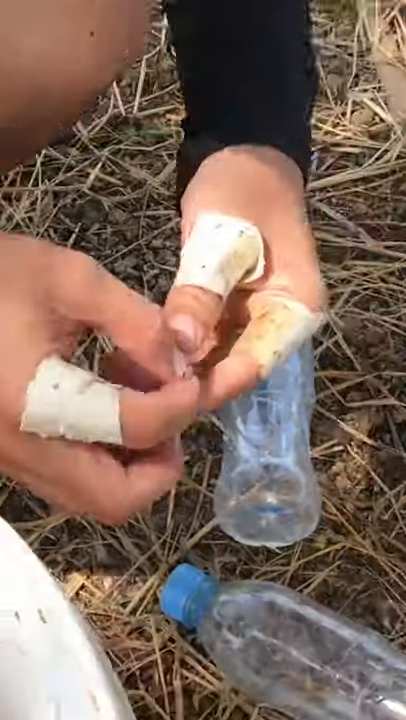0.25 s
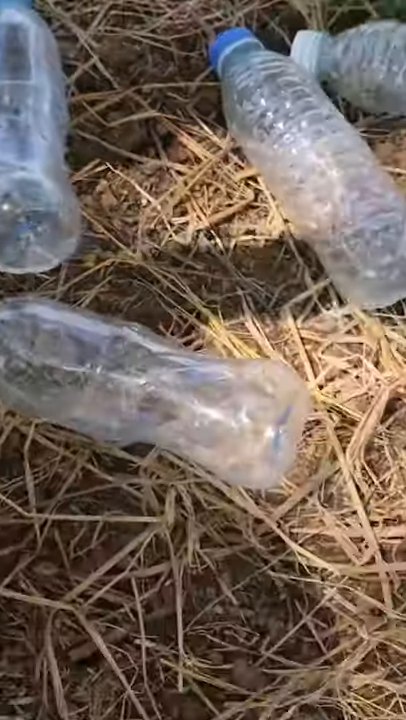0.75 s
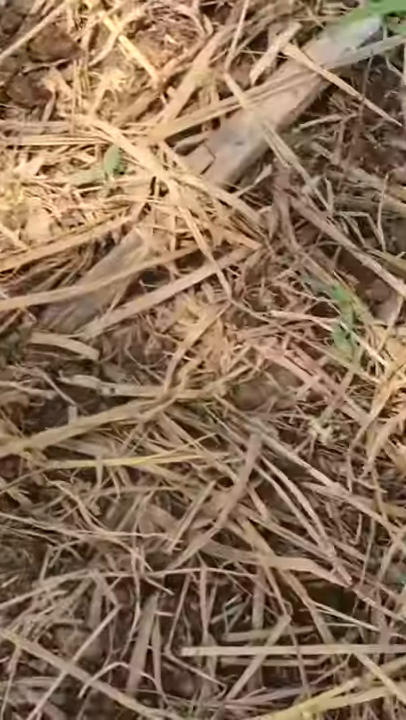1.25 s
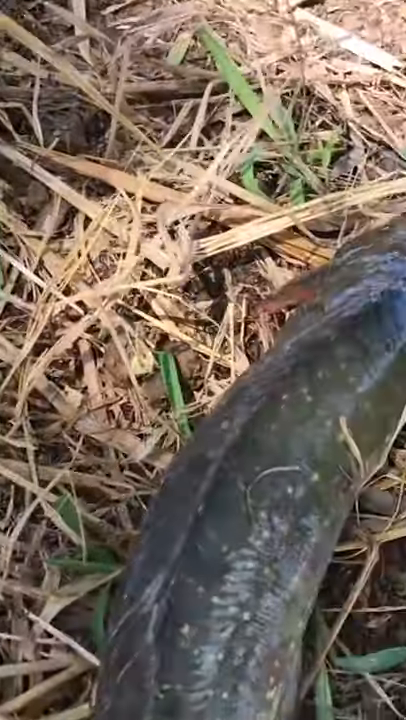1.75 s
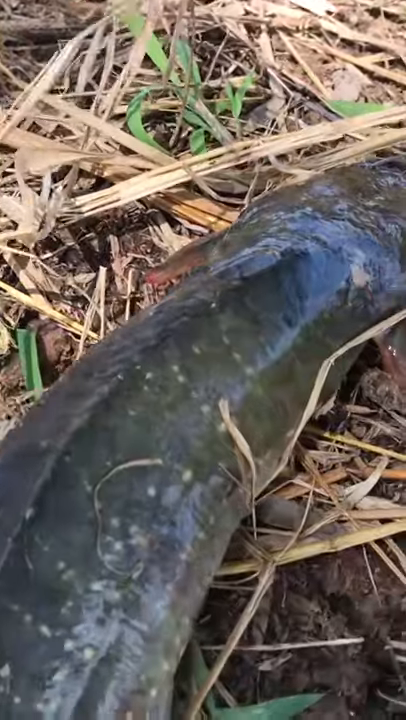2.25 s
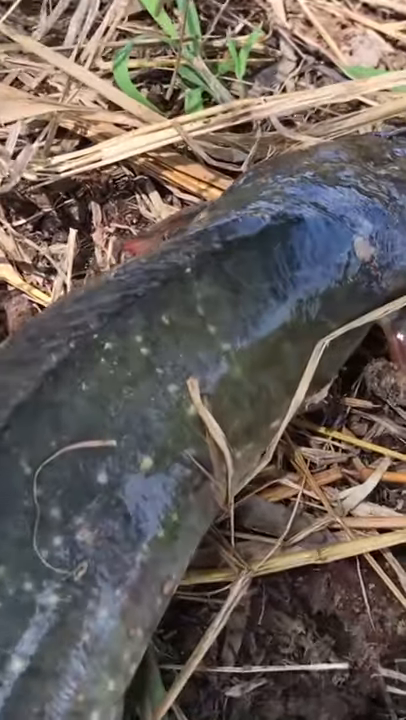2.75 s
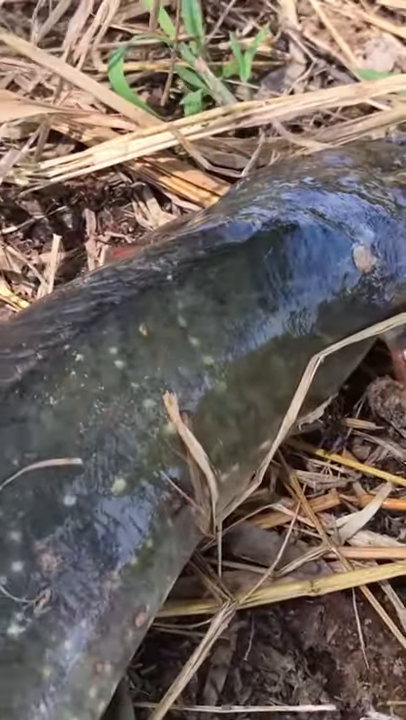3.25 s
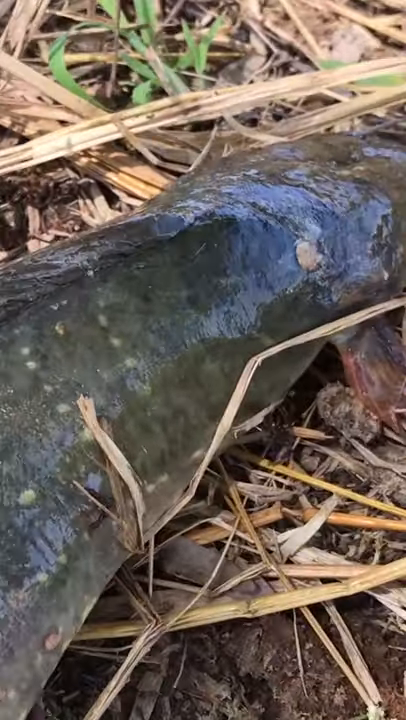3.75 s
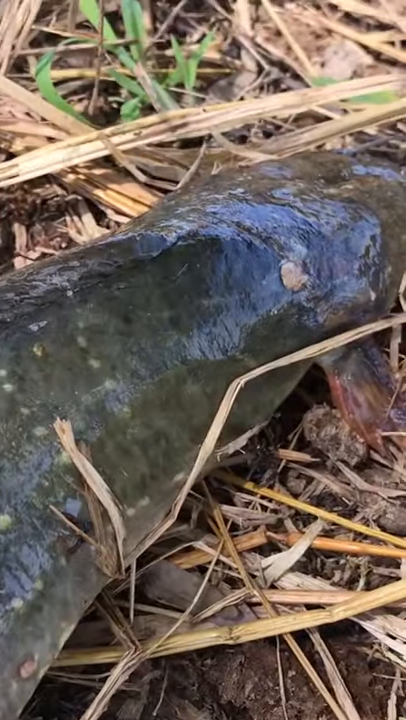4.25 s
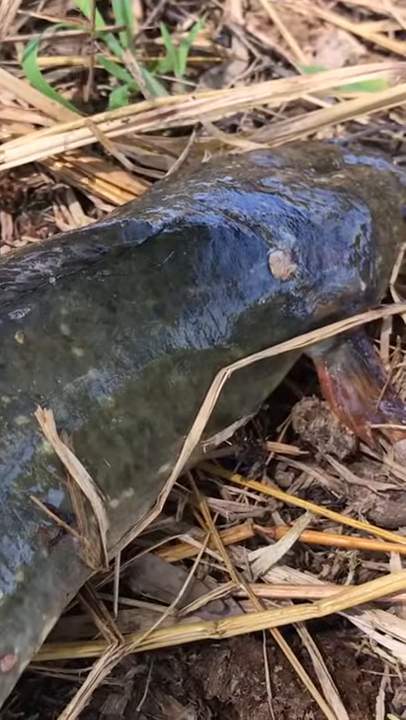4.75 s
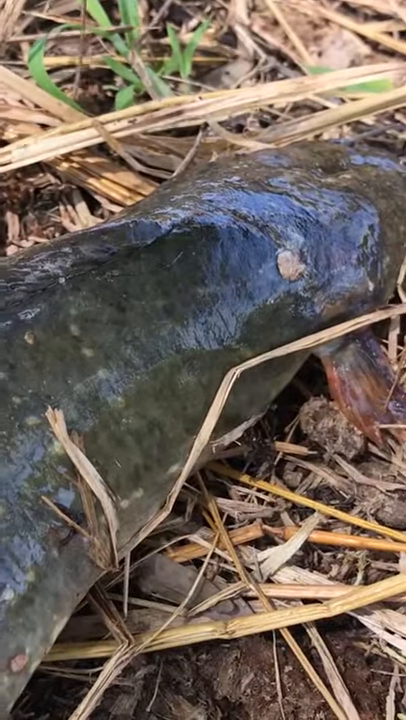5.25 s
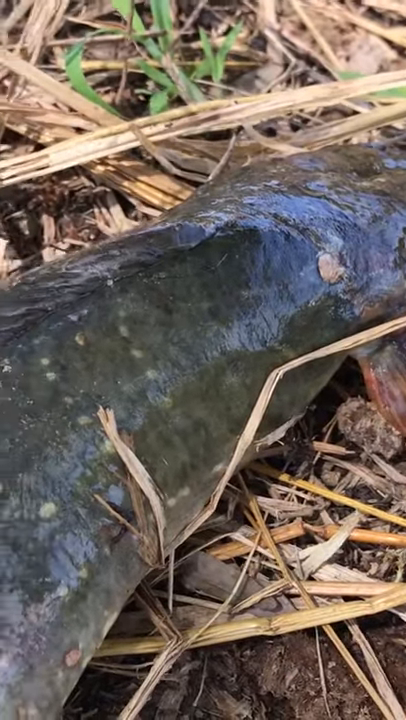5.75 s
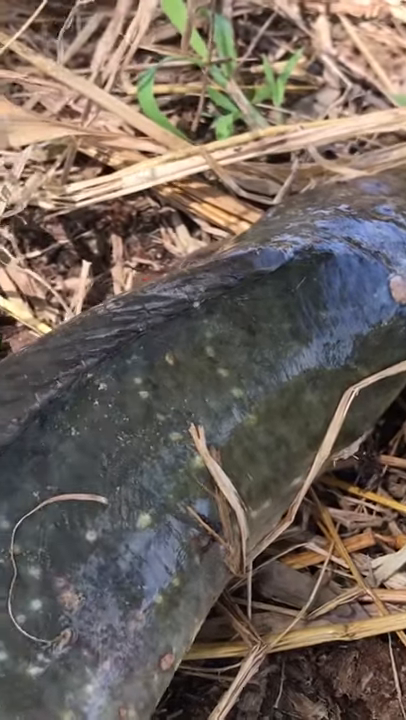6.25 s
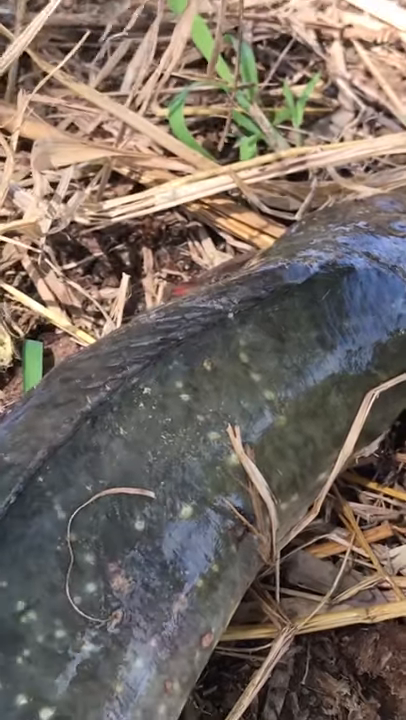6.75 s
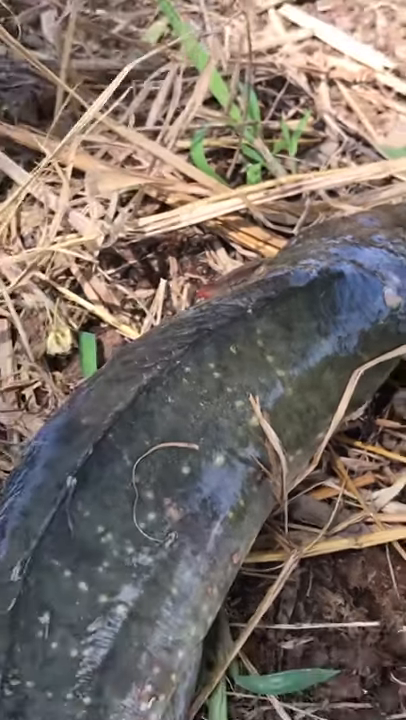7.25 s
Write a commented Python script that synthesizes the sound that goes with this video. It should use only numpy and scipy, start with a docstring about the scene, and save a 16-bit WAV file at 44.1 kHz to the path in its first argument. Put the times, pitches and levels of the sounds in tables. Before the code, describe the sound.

Outdoors on dry straw, close to the microphone, straw rustles and a faint squeak sounds early. Then thin plastic bottles crackle: a few snaps, a dense loud flurry in the middle, and a last tight group. Afterwards it is nearly quiet, with two small ticks, soft straw, a distant low engine rumble and sparse bird chips.

```python
"""Outdoors, on dry straw, thin plastic bottles crinkle: dents in their walls flip with short, dry snaps.
Each snap is filtered noise plus a dying tone; faint noise swells just before it and a faint tail follows.
Straw rustles, hisses and scrapes close by (shaped noise and tiny ticks); one faint squeak falls early on.
Far off are a low rumble of noise, an engine hum of steady multiples and a few bird chips of gliding tone."""
import sys
import numpy as np
from scipy import signal
from scipy.fft import rfft, irfft, next_fast_len
from scipy.io import wavfile
from scipy.ndimage import uniform_filter1d, map_coordinates

SR = 44100
rng = np.random.default_rng(int(sys.argv[2]) if len(sys.argv) > 2 else 0)


def waveform_to_disk(signal):
    """Save audio, clipped to [-1, 1], as 16-bit WAV at the path in sys.argv[1]."""
    frames = np.transpose(np.atleast_2d(signal))
    scaled = np.clip(frames, -1, 1) * 32767
    samples = np.round(scaled).astype(np.int16)
    wavfile.write(sys.argv[1], SR, samples)


N = 330309
TIME = np.arange(N) / SR


def amp(db):
    """Turn decibels into a plain factor."""
    return 10 ** (np.asarray(db) / 20)


def unit(x):
    """Scale x to an average strength (rms) of 1."""
    return x / np.sqrt(np.mean(x ** 2) + 1e-20)


def curves(rows):
    """One value per sample for each column after the time."""
    times, *columns = np.transpose(rows)
    return [np.interp(TIME, times, column) for column in columns]


def wobble(rate):
    """A smooth random curve through `rate` random points a second."""
    points = rng.standard_normal(int(N * rate / SR) + 4)
    return map_coordinates(points, [TIME * rate])


def filtered(x, response):
    """Multiply the spectrum of x by a response that depends on frequency."""
    size = next_fast_len(N + SR // 2)
    spectrum = rfft(x, size) * response(np.fft.rfftfreq(size, 1 / SR))
    return irfft(spectrum, size)[:N]


def coloured(x, spectrum):
    """Shape x by a table of (frequency, level) points, then bring it to rms 1."""
    points_hz, points_db = np.transpose(spectrum)
    return unit(filtered(x, lambda hz: amp(np.interp(np.log(hz + 1), np.log(points_hz), points_db))))


def band(x, lo_hz, hi_hz, order=3):
    """Keep only the band between two frequencies."""
    edges = [lo_hz, min(hi_hz, SR / 2 - 1)]
    return signal.sosfilt(signal.butter(order, edges, "band", fs=SR, output="sos"), x)


def burst(x):
    """Scale a short sound to hold the energy of 10 ms at rms 1."""
    return x * np.sqrt(.01 * SR / (np.sum(x ** 2) + 1e-20))


def add(track, s, x):
    """Mix x into the track from time s."""
    start = max(round(s * SR), 0)
    track[start:start + len(x)] += x[:max(N - start, 0)]


def arch(length):
    """Time axis and a swell that rises faster than it dies."""
    t = np.arange(int(max(length, .004) * SR)) / SR
    return t, np.sin(np.pi * (t / t[-1]) ** 0.45) ** 2


# colour of the far rumble: (frequency [Hz], relative level [dB])
RUMBLE_COLOUR = [(13, -40.5), (22, -24.5), (49, -0.5), (113, -3.5), (155, -7.5), (172, -22), (204, -13),
                 (269, -15.5), (354, -19.5), (398, -24.5), (555, -27.5), (700, -26), (910, -53.5),
                 (1540, -120)]
RUMBLE_DB, RUMBLE_SWING_DB = -57, 1.5  # level and slow drift
# engine hum: (multiple of the firing rate, level [dB])
ENGINE_ORDERS = [(3, -69.5), (4, -69), (5, -63.5), (6, -62), (7, -67.5)]
FIRING_HZ = 24.47


def distance():
    """Low outdoor rumble, and a far engine whose hum sits on multiples of its unsteady firing rate."""
    noise = coloured(rng.standard_normal(N), RUMBLE_COLOUR)
    rumble = amp(RUMBLE_DB + RUMBLE_SWING_DB * wobble(6)) * noise
    firing_hz = FIRING_HZ * (1 + .006 * wobble(3.9))
    phase = 2 * np.pi * np.cumsum(firing_hz) / SR
    hum = np.zeros(N)
    for multiple, db in ENGINE_ORDERS:
        tone = np.sin(multiple * phase + 2 * np.pi * rng.random())
        hum += amp(db + 0.91 * wobble(3.1)) * unit(tone)
    return rumble + hum


# far small birds: (time [s], length [s], pitch [Hz], level before the swell and a common trim [dB])
BIRD_CHIPS = [(.125, 0.048, 3930, -65), (2.52, 0.058, 4320, -66), (2.583, 0.044, 3900, -62),
              (4.917, 0.017, 5850, -74), (5.029, 0.015, 5830, -71), (5.973, 0.019, 5977, -75.5),
              (6.806, 0.022, 5820, -69)]


def birds():
    """Far birds give short tones that fall slightly, flutter, and swell and fade smoothly."""
    out, flutter = np.zeros(N), .012 * wobble(500)
    for s, length, hz, db in BIRD_CHIPS:
        t, swell = arch(length)
        fall = 0.046 * (.5 - t / t[-1])
        pitch = hz * (1 + fall + flutter[round(s * SR):][:len(t)])
        tone = unit(np.sin(2 * np.pi * np.cumsum(pitch) / SR))
        add(out, s, amp(db - 2.0) * swell * tone)
    return out


# strokes over the straw: (time near the peak [s], rise [s], fall [s],
#                          rustle level before a trim [dB], hiss level before a trim [dB])
STROKES = [(.01, 0.072, 0.052, -59, -55.5), (.33, .11, 0.25, -59, -52), (1.2, .3, 0.18, -67.5, -72.5),
           (2.02, .22, .2, -58, -64), (3.5, .19, 0.099, -56, -60), (4.05, .2, .25, -66.5, -77.5),
           (7.45, .45, .3, -73, -72)]
STILL_RUSTLE_DB, STILL_HISS_DB = -73.5, -81  # the straw at rest, before the same trims


def brushing():
    """Rustle and hiss levels in dB: each stroke swells and fades over the straw at rest."""
    power = amp([[STILL_RUSTLE_DB], [STILL_HISS_DB]]) ** 2
    for s, rise, fall, rustle_db, hiss_db in STROKES:
        swell = 2 * np.exp(-np.logaddexp((s - TIME) / rise, (TIME - s) / fall))
        power = power + (amp([[rustle_db], [hiss_db]]) * swell) ** 2
    return 10 * np.log10(power)


def stalks(rate, spread_db, tick_db):
    """Smooth rubbing noise with dense, tiny ticks of single stalks, `rate` a second, each very short."""
    t = np.arange(SR // 150) / SR
    ticks = np.zeros(N)
    for when, pitch, size in rng.random((int(rate * N / SR), 3)):
        hz = 700 * 22 ** pitch
        tick = np.sqrt(hz) * np.sin(2 * np.pi * hz * t) * np.exp(-hz * t)
        add(ticks, when * N / SR, amp(spread_db * size) * tick)
    return rng.standard_normal(N) + amp(tick_db) * unit(ticks)


def patchy(x, depth_db):
    """The colour drifts as different stalks take over: random smooth gains over time and frequency."""
    cells = signal.stft(x, nperseg=512)[2]
    field = rng.standard_normal(cells.shape)
    field = uniform_filter1d(field, size=6, axis=0)
    field = uniform_filter1d(field, size=24, axis=1)
    return unit(signal.istft(cells * amp(depth_db * unit(field)), nperseg=512)[1][:N])


# colour of the straw's rustle: (frequency [Hz], relative level [dB])
RUSTLE_COLOUR = [(180, -28), (300, -2.5), (404, -2), (872, -5), (1210, -6), (2140, -9), (2570, -10),
                 (3100, -13), (4950, -15), (9000, -19.5), (11700, -30.5), (19800, -120)]
# colour of the straw's hiss: (frequency [Hz], relative level [dB])
HISS_COLOUR = [(1760, -42.5), (3000, -11.5), (4520, -11.5), (4950, -14), (6400, -9.5), (7610, -11.5),
               (10300, -6), (14800, 1.5), (15800, -3.5)]


def straw():
    """Dry stalks rub together: a fuller rustle and a bright hiss, both louder when brushed."""
    rustle_db, hiss_db = brushing()
    rustle = coloured(stalks(rate=490, spread_db=20, tick_db=-8), RUSTLE_COLOUR)
    rustle = patchy(rustle, depth_db=2.0)
    hiss = coloured(stalks(rate=630, spread_db=19.5, tick_db=-5.5), HISS_COLOUR)
    rustle_gain = amp(rustle_db - 0.94 + 1.3 * wobble(18))
    hiss_gain = amp(hiss_db + 1.0 + 0.7 * wobble(20))
    return rustle_gain * rustle + hiss_gain * hiss


# level is relative to the rustle level from brushing()
STALK_CRACKS_PER_S, STALK_CRACK_DB, STALK_SPREAD_DB, STALK_CRACK_HZ = 5.1, -0.5, 3, 2100


def stalk_cracks():
    """Now and then a dry stalk gives way with a faint noise tick, louder while the straw is brushed."""
    out, t = np.zeros(N), np.arange(SR // 30) / SR
    for when, size, pitch in rng.random((int(STALK_CRACKS_PER_S * N / SR), 3)):
        hz = STALK_CRACK_HZ * 2 ** (pitch - .5)
        noise = rng.standard_normal(len(t)) * np.exp(-t / 0.0036)
        tick = burst(band(noise, hz * .5, hz * 2, order=1))
        add(out, when * N / SR, amp(STALK_CRACK_DB + STALK_SPREAD_DB * (2 * size - 0.5)) * tick)
    rustle_db, _ = brushing()
    return amp(rustle_db) * out


# stalks and plastic sliding on each other:
# (time [s], length [s], centre [Hz], width [Hz], level before the swell and uneven grip [dB])
SLIDES = [(0.348, 0.69, 760, 435, -61.5), (.52, 0.97, 2250, 600, -70.5), (0.646, .033, 5900, 6000, -54.5),
          (0.677, 0.016, 3200, 500, -55), (0.985, .093, 13000, 5100, -55), (1.206, .004, 12700, 6000, -53),
          (2.099, 0.52, 1750, 1090, -67), (3.288, 0.29, 580, 450, -56), (3.682, 0.15, 5800, 800, -66),
          (3.871, 0.44, 3950, 1100, -70), (4.252, .12, 3280, 500, -65), (4.146, 0.26, 537, 490, -59.5),
          (5.411, .042, 2090, 702, -67.5), (5.553, .035, 1696, 2200, -68),
          (7.108, 0.021, 2695, 4000, -64.5), (7.201, 0.012, 14000, 3490, -59.5),
          (7.285, 0.028, 4000, 5960, -67.5)]


def scrapes():
    """Each slide catches and slips: one broad band of noise whose strength varies unevenly."""
    out, grip = np.zeros(N), amp(5.3 * wobble(110))
    for s, length, hz, width_hz, db in SLIDES:
        t, swell = arch(length)
        lo_hz = np.hypot(hz, width_hz / 2) - width_hz / 2
        rub = unit(band(rng.standard_normal(len(t)), lo_hz, lo_hz + width_hz, order=2))
        add(out, s, amp(db) * swell * rub)
    return out * grip


# path of the squeak, before its random wobble: (time [s], pitch [Hz], level [dB])
SQUEAK_PATH = [(.2, 973, -76), (.22, 835, -59), (.25, 664, -62), (.275, 592, -48.5), (.305, 597, -57.5),
               (.335, 581, -46.5), (.35, 608, -44.5), (.37, 590, -87)]


def squeak():
    """A thin, slightly rough tone with a faint octave above; it slides down and settles."""
    hz, db = curves(SQUEAK_PATH)
    phase = 2 * np.pi * np.cumsum(hz * (1 + 0.021 * wobble(154.3))) / SR
    sounding = (TIME > SQUEAK_PATH[0][0]) & (TIME < SQUEAK_PATH[-1][0])
    tone = unit(np.sin(phase) + amp(-35) * np.sin(2 * phase))
    return sounding * amp(db + 3.2 * wobble(86.5)) * tone


def random_ticks():
    """Tiny noise ticks, two strewn at random times around each snap."""
    out, t = np.zeros(N), np.arange(SR // 80) / SR
    for s, db, *_ in SNAPS:
        for delay, size, pitch in rng.standard_normal((2, 3)):
            hz = 2300 * np.exp(0.54 * np.clip(pitch, -2, 2))
            noise = rng.standard_normal(len(t)) * np.exp(-t / 0.0014)
            tick = burst(band(noise, hz / 3.5, hz * 1.2, order=1))
            level_db = -47 + 0.53 * db + 2 * np.clip(size, -2, 2)
            add(out, s + 0.015 + .04 * delay, amp(level_db) * tick)
    return out


# resonances of a bottle wall: (frequency [Hz], width [Hz], level [dB])
WALL_RESONANCES = [(380, 30, -3), (590.5, 110, 4), (1043, 50, -2.5), (1570, 360, 2), (2120, 430, -2.5),
                   (3460, 900, -1.5), (4400, 350, 2), (5928, 280, -0.5), (7305, 300.2, -9.5),
                   (10000, 450, -12.5), (14400, 870, -3.5)]


def buckle(t, life, ring, ring_db):
    """Tiny uneven folds plus flexing (noise with two decays), heard through the wall's resonances."""
    push = np.exp(-(t / life) ** 1.4) + amp(ring_db) * np.exp(-t / ring)
    rise = .00004 * (life / 0.0012) ** 2  # slow dents start softly
    folds = rng.standard_normal(len(t)) * push * (1 - np.exp(-t / rise))
    out = folds
    for hz, width, db in WALL_RESONANCES:
        out = out + amp(db) * signal.lfilter(*signal.iirpeak(hz, hz / width, SR), folds)
    return out


def snap(knock_db, crack_db, sizzle_db, panel_hz, life):
    """One dent flips: the crease cracks and sizzles, the panel swings, the hollow body knocks."""
    t = np.arange(SR // 16) / SR
    swing = np.sin(2 * np.pi * panel_hz * t) * np.exp(-t / 0.0012) * (1 - np.exp(-t / 0.00053))
    stiff = (panel_hz / 1700) ** .3  # a small, stiff dent flexes in a higher band
    flex = band(buckle(t, life=1.8 * life, ring=0.0038, ring_db=0.0), 930 * stiff, 2550 * stiff)
    own_pitch = signal.lfilter(*signal.iirpeak(panel_hz, 5.5, SR), flex)
    flex = flex + amp(0.5) * own_pitch  # the panel favours its own pitch
    panel = burst(burst(flex) + amp(-3) * burst(swing))
    knock = burst(band(buckle(t, life=.005, ring=.008, ring_db=-7.5), 240, 800, order=2))
    crack = burst(band(buckle(t, life=1.5 * life, ring=0.0033, ring_db=-8.5), 3000, 7000))
    sizzle = burst(band(buckle(t, life=1.4 * life, ring=.0045, ring_db=-15.5), 7000, 15000))
    low_parts = amp(0.5) * panel + amp(knock_db - 0.5) * knock
    return low_parts + amp(crack_db - 1.1) * crack + amp(sizzle_db - 0.34) * sizzle


def scatter(x, t60, dull_db):
    """The faint, quick answer of the ground and plants around: x smeared by fading noise."""
    t = np.arange(SR // 4) / SR
    noise = rng.standard_normal(len(t))
    dulled = noise + amp(dull_db) * band(noise, 200, 1800, order=1)
    tail = dulled * amp(-60 * t / t60) * (1 - np.exp(-t / .005))
    return signal.fftconvolve(x, tail / np.linalg.norm(tail))


def lead_in(rise):
    """A faint noise that swells over a few ms before each snap."""
    t = np.arange(SR // 50) / SR
    noise = band(rng.standard_normal(len(t)), 700, 3600, order=2)
    return burst(noise * np.exp((t - t[-1]) / rise))


# squeezes, in which small dents give way: (start time [s], length [s], dents per second, middle level [dB])
SQUEEZES = [(0.119, 0.074, 28, -61), (2.091, .05, 40, -53), (2.741, .03, 60, -57.5),
            (3.308, .15, 40, -56.5), (3.52, .18, 22, -55.5), (3.96, .3, 20, -60), (4.389, .1, 30, -63.5),
            (5.231, 0.068, 28, -68)]
# a small dent is slow, dull and hollow; knock and crack are relative to its level, before trims
DENT_SPREAD_DB, DENT_KNOCK_DB, DENT_CRACK_DB, DENT_HZ, DENT_BUCKLE_S = 2.5, 5.5, -12, 1400, .0032


def small_dents():
    """Rows like those of the snaps, falling unevenly through each squeeze."""
    rows = []
    for start, length, rate, db in SQUEEZES:
        count = max(round(length * rate), 1)
        for k, (late, size, crack, pitch) in enumerate(rng.uniform(-1, 1, (count, 4))):
            s = start + length * (k + .5 + .5 * late) / count
            level_db = db + DENT_SPREAD_DB * size
            crack_db = DENT_CRACK_DB + 4.5 * crack
            panel_hz = DENT_HZ * 1.5 ** pitch
            rows.append((s, level_db, DENT_KNOCK_DB, crack_db, panel_hz, DENT_BUCKLE_S))
    return rows


# dents that flip with a clear snap; levels are before small trims:
# (time [s], level [dB], hollow knock relative to level [dB], crack relative to level [dB],
#  panel pitch [Hz], buckling time before each part's stretch [s])
SNAPS = [(.025, -43.5, -2.5, -4, 1280, 0.0023), (0.4044, -53.5, -6, -5.5, 1960, 0.0042),
         (1.3508, -59.5, -2, -8, 1590, 0.003), (1.5166, -39.5, -30, -6.5, 2000, 0.0015),
         (1.5361, -35, -3, -26.5, 1370, 0.0015), (1.5489, -28.5, -13.5, -4, 1480, 0.0013),
         (1.8672, -32, -2, 0.5, 2080, 0.0017), (1.8894, -33.5, -4.5, 1, 1750, 0.0015),
         (1.9561, -29.5, -6, -4, 1820, .0025), (1.9623, -26.5, -10, -5, 1410, 0.0014),
         (2.0297, -47, 0.5, 0, 2360, 0.0022), (2.054, -44.5, 0, -13, 1090, 0.019),
         (2.0847, -43.5, -5.5, -6.5, 1880, 0.0038), (2.4024, -47, -18, -12, 2080, 0.0031),
         (2.4258, -45.5, -3, -8.5, 1370, 0.0035), (2.6532, -53.5, -14, -2, 2000, 0.00099),
         (2.7261, -39, -9, -19, 1440, 0.0023), (2.8463, -48, -11, -20, 1370, .0066),
         (2.8573, -37, -4.5, -13.5, 1480, 0.0041), (2.8632, -30.5, -6, -3, 1160, .0017),
         (2.8893, -29, -12, -1, 1450, 0.0014), (3.0526, -34.5, -16.5, 0.5, 2050, 0.0015),
         (3.0633, -44.5, -14, -9, 2130, .005), (3.121, -35.5, -7, 0.5, 1700, 0.0019),
         (3.1818, -41.5, -4, -3, 2020, 0.0027), (3.1896, -37.5, -7, 2, 2300, 0.0029),
         (3.2168, -45, 1.5, -7, 2040, .0022), (3.223, -45.5, -2.5, -8.5, 1260, .0034),
         (3.237, -45.5, -11.5, -4.5, 1270, .0023), (3.2823, -34, -9, -1, 1910, 0.0021),
         (3.2974, -24, -17, -1.5, 2190, 0.0015), (3.334, -40.5, 0.5, -7.5, 1780, 0.0019),
         (3.3453, -46.5, 0, -1.5, 2030, 0.0023), (3.384, -45.5, 5.5, -12.5, 1975, 0.0052),
         (3.4654, -27.5, -17.5, 3, 1730, 0.0019), (3.4982, -19.5, -13.5, -4, 1856, 0.0013),
         (3.5619, -35, -7.5, -8.5, 2020, 0.0027), (3.571, -36, -3, -4.5, 2000, 0.0029),
         (3.5803, -30, -11, -9, 1900, 0.0025), (3.5976, -46, -6, -1.5, 2480, 0.004),
         (3.6105, -21, -12, -3.5, 2290, 0.0025), (3.7626, -39, -5, -2.5, 1610, 0.0022),
         (3.7798, -39.5, -10, -10, 2320, .006), (3.7854, -33, -3, -11.5, 2060, 0.0014),
         (3.7929, -36, -13, -2, 2160, 0.0014), (3.8025, -42.5, 9, 2, 2020, .001),
         (3.8054, -35.5, -16, -15.5, 1500, 0.0011), (4.03, -49, -16, -3, 2100, 0.00048),
         (4.087, -47, -2, 1, 1010, 0.0039), (4.1296, -26.5, -10, -7, 2100, 0.0011),
         (4.2542, -48, -1, -14.5, 1420, 0.0028), (4.2724, -39, -12, -12, 2070, 0.0019),
         (4.285, -42, -7, -22.5, 1480, 0.0024), (4.322, -41.5, -4.5, -10, 2540, 0.0017),
         (4.341, -49.5, 2, -6.5, 1680, .0014), (4.572, -27.5, -5, 3, 1633, 0.0025),
         (4.5867, -24.5, -10.5, -0.5, 1490, 0.00068), (4.6051, -26.5, -12.5, -3, 1160, 0.0032),
         (4.6325, -32, -5, 2, 1444, 0.0029), (4.722, -62.5, -3, -20.5, 1550, .0026),
         (5.1102, -57, -8, -12.5, 1834, 0.0022), (6.3127, -45, -12.5, 6, 1247, 0.0024),
         (6.3174, -43, -12.5, 0, 1294, 0.0017), (6.5171, -66, -3, -10.5, 1083, .0032)]
MIDDLING_DB = -36.5  # the level of a middling snap
# sizzle relative to the snap's level: it grows with the crack and with the force of the flip
SIZZLE_DB, SIZZLE_PER_CRACK_DB, SIZZLE_PER_DB = -7, 1.47, 0.3446


def bottles():
    """Dents, clear and small, flip: faint noise swells before each and a scattered tail follows it."""
    out = np.zeros(N)
    for s, db, knock_db, crack_db, panel_hz, life in SNAPS + small_dents():
        sizzle_db = SIZZLE_DB + SIZZLE_PER_CRACK_DB * crack_db + SIZZLE_PER_DB * (db - MIDDLING_DB)
        before = amp(db - 25.0) * lead_in(rise=.003)
        pop = amp(db) * snap(knock_db, crack_db, sizzle_db, panel_hz, life)
        add(out, s - len(before) / SR, before)
        add(out, s, pop)
        add(out, s, amp(-26.5) * scatter(pop, t60=0.11, dull_db=-16.0))
    return out


def scene():
    """Birds and rumble far off, straw and bottles close by."""
    far = distance() + birds()
    dry_straw = straw() + stalk_cracks() + scrapes() + squeak()
    snapping = random_ticks() + bottles()
    return (far + dry_straw + snapping)[None]


# narrow dips in the microphone's response: (frequency [Hz], width [Hz], level [dB])
MICROPHONE_DIPS = [(852, 110, -2.5), (2647, 57, -2.5), (4950, 160, -3), (7630, 230, -2), (10560, 300, -6)]
TOP_HZ = 16000  # the microphone's band limit


def record(dry):
    """The microphone sheds the deepest bass, has a few narrow dips and stops at its band limit."""
    def response(hz):
        dips_db = sum(db * np.exp(-((hz - centre) / width) ** 2) for centre, width, db in MICROPHONE_DIPS)
        return amp(dips_db) * (hz < TOP_HZ)

    low_cut = signal.butter(3, 31, "high", fs=SR, output="sos")
    return filtered(signal.sosfilt(low_cut, dry[0]), response)[None]


dry = scene()
out = record(dry)
waveform_to_disk(out)
```